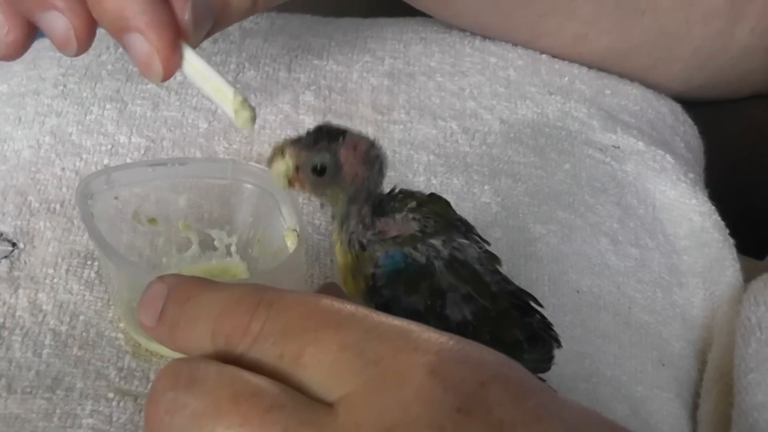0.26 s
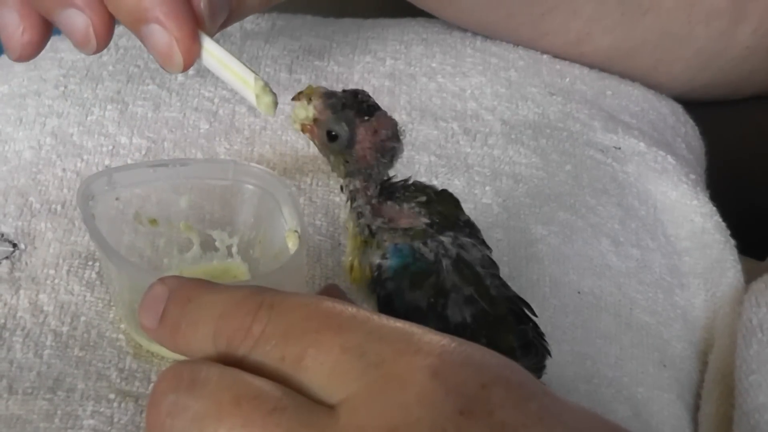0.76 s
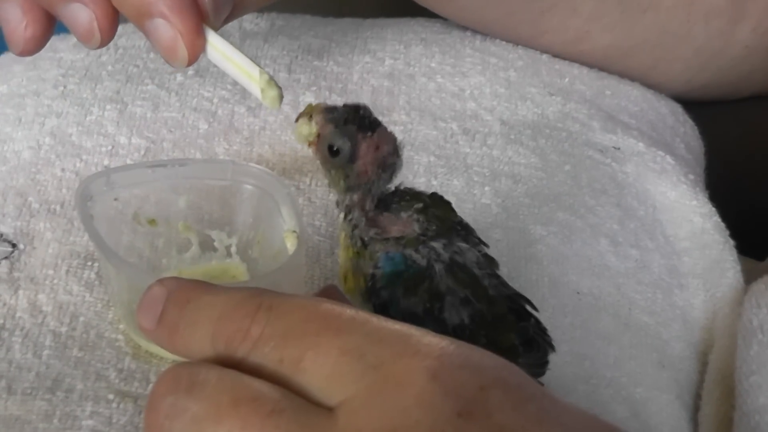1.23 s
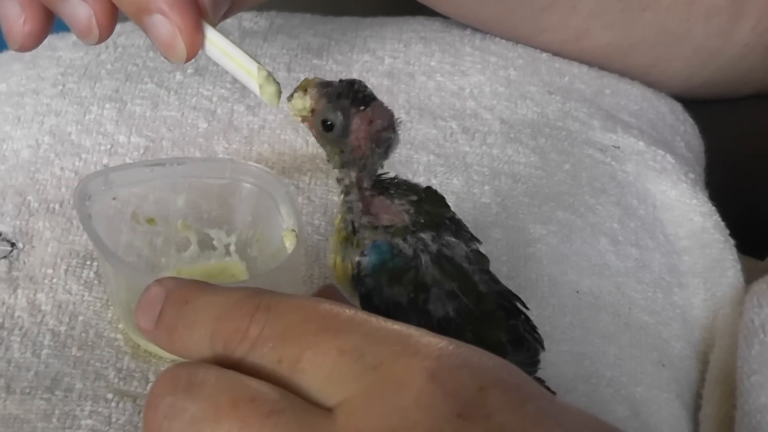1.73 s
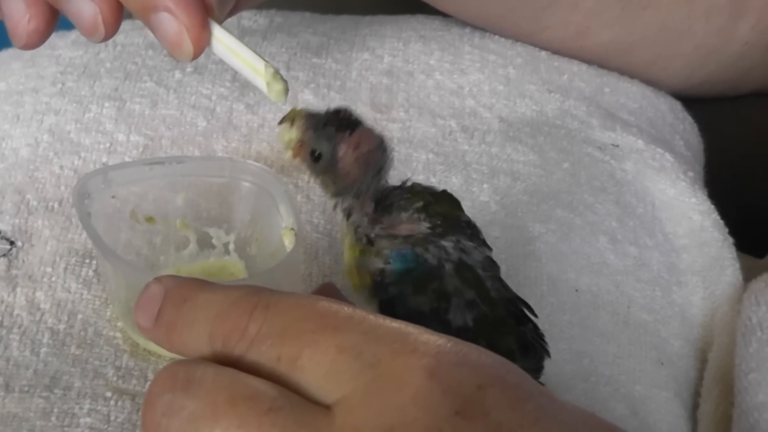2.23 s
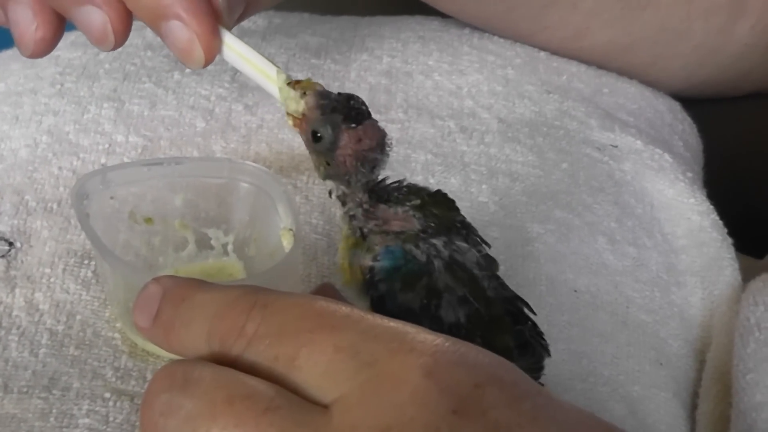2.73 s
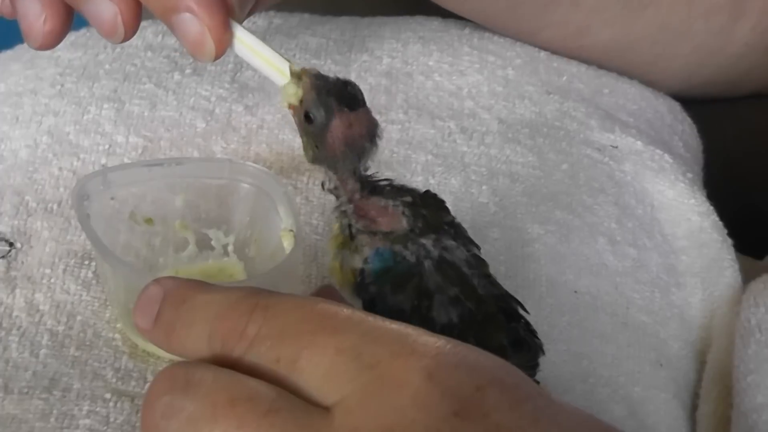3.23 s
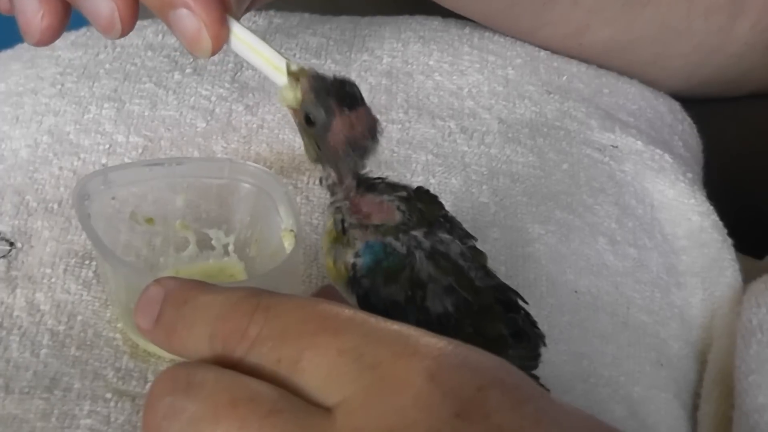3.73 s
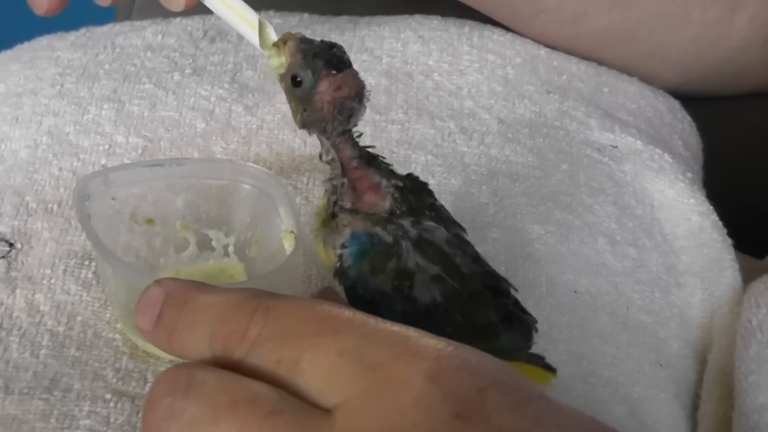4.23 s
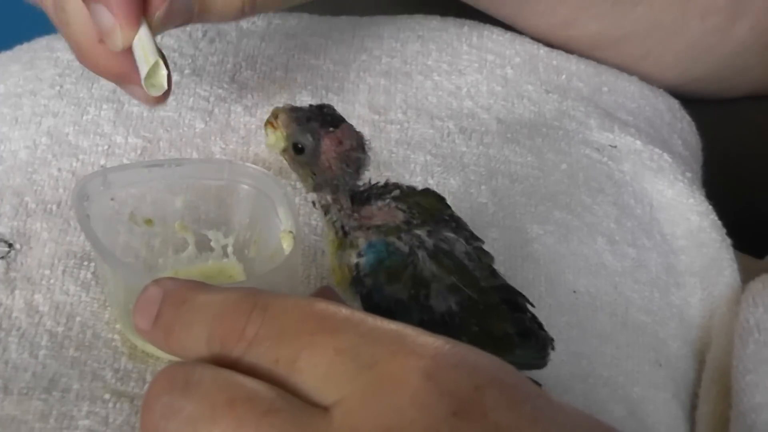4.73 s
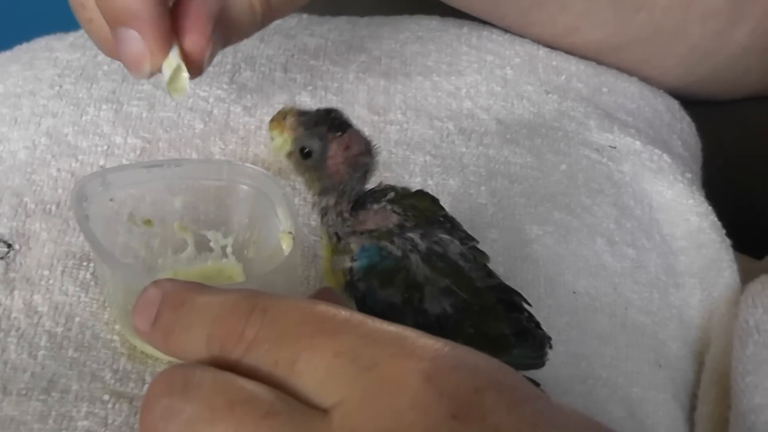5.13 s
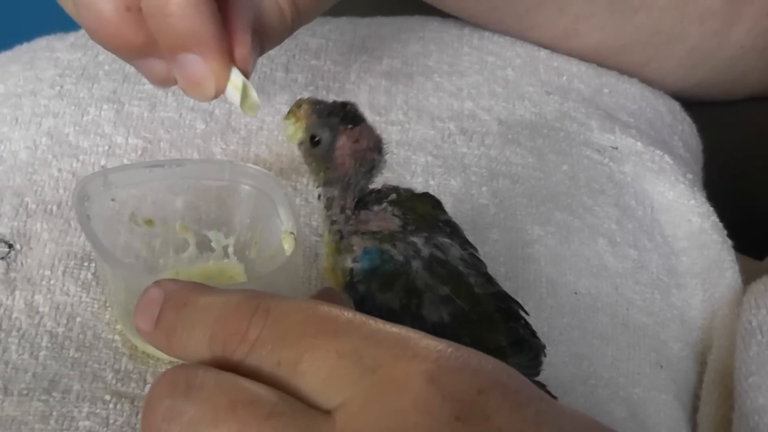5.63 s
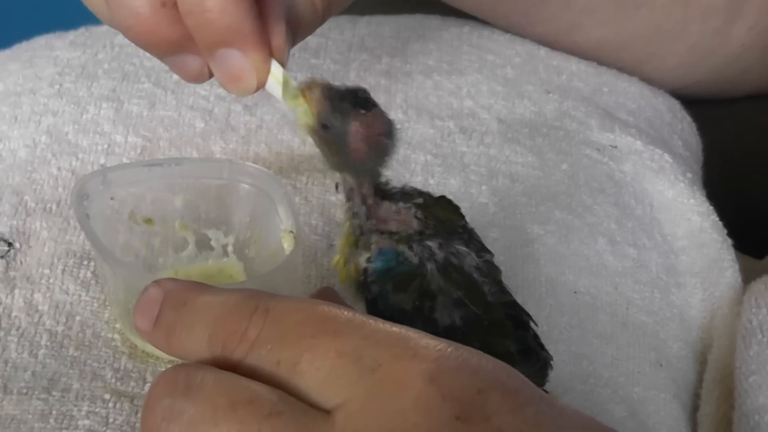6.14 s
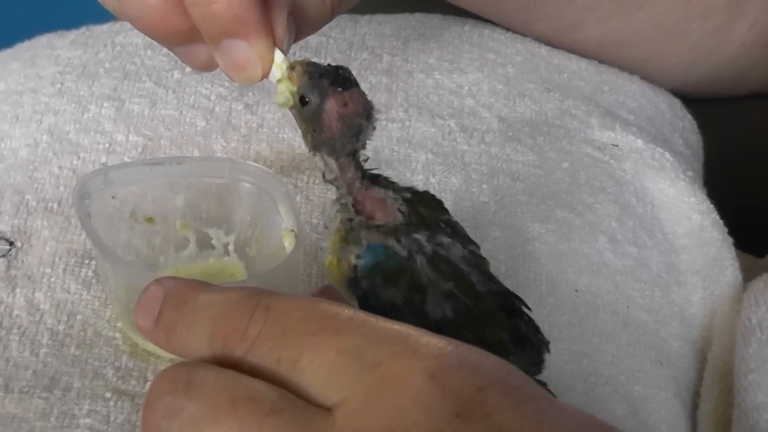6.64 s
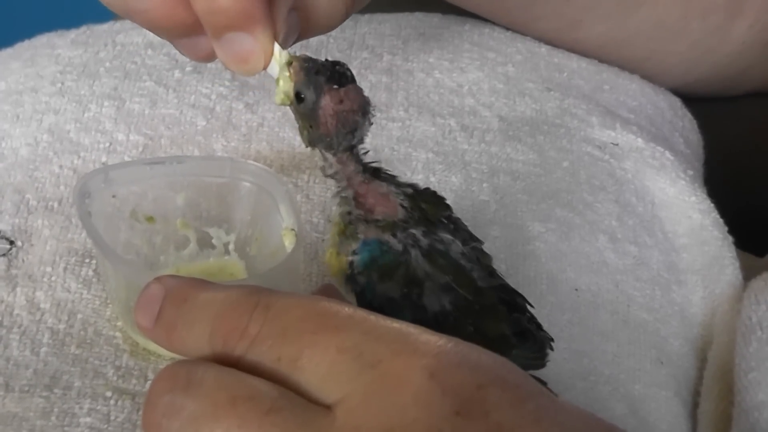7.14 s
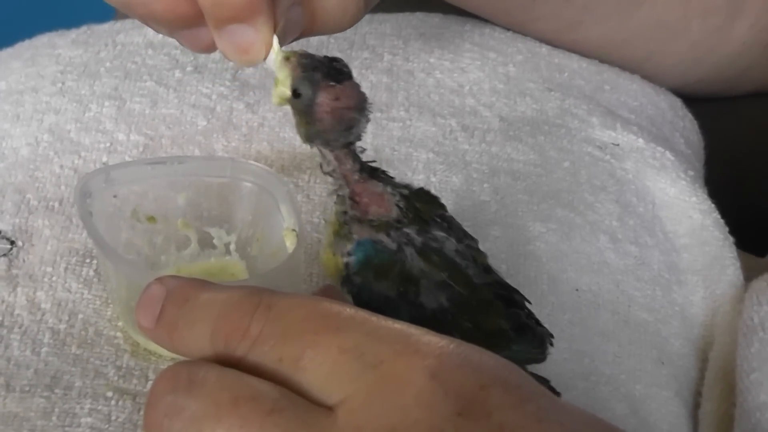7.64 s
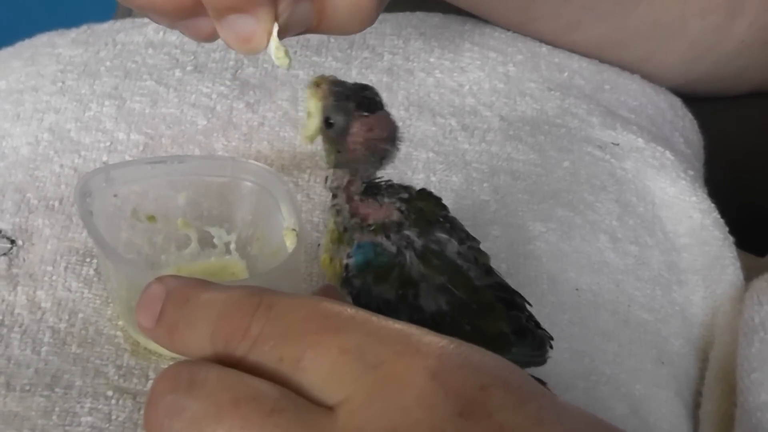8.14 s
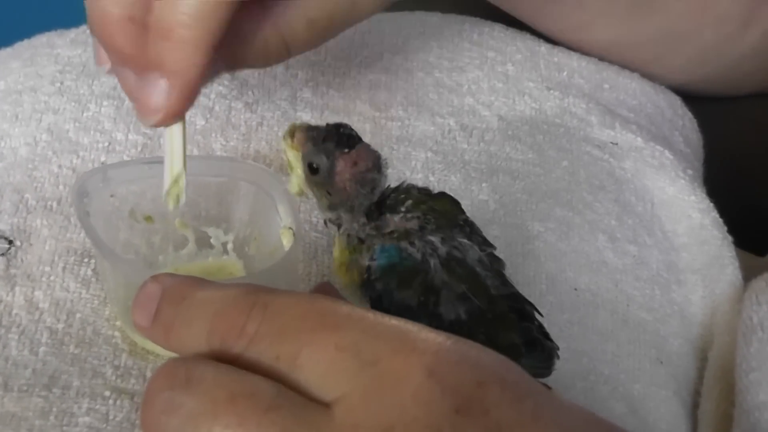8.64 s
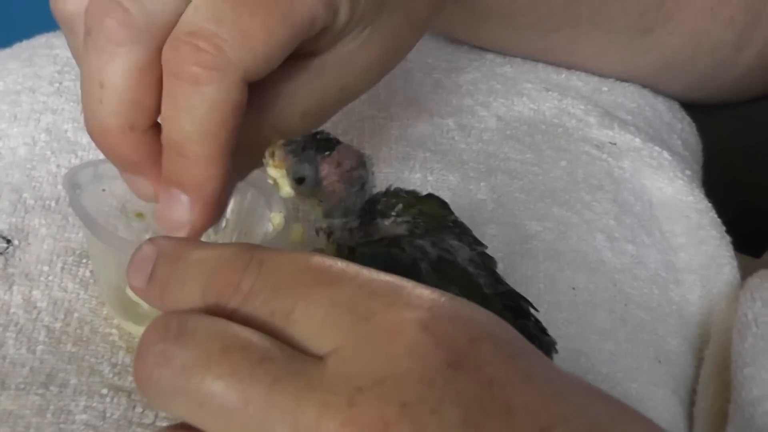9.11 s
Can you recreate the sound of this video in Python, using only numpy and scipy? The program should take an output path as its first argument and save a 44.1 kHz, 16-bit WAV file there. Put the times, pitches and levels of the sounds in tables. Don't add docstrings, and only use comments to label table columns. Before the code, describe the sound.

Indoors, a young bird being hand-fed gives two early chirps, a run of six, one lone call, a run of four, then a final single one. Each is a brief raspy scrape snapping into a piercing whistle that dips and rebounds. Soft airy breaths, dry ticks and faint rubbing fill the pauses, with a muffled road rumble behind. Close miking, short room ring, slight lean to the right; a small cup tap ends it.

```python
import sys
import numpy as np
from scipy import signal
from scipy.fft import rfft, irfft, next_fast_len
from scipy.io import wavfile
from scipy.ndimage import uniform_filter1d

SR = 44100
rng = np.random.default_rng(int(sys.argv[2]) if len(sys.argv) > 2 else 0)


def put_to_file(sound):
    columns = np.atleast_2d(sound).T
    safe = np.clip(columns, -1, 1)
    whole_steps = np.round(safe * 32767)
    wavfile.write(sys.argv[1], SR, whole_steps.astype(np.int16))


def gain_from_decibels(decibels):
    exponent = np.asarray(decibels, float) / 20
    return 10 ** exponent


N = 413216
TIME = np.arange(N) / SR


def rms_one(x):
    return x / np.sqrt(np.mean(x ** 2) + 1e-20)


def in_time(rows, t=TIME):
    s, *columns = np.transpose(rows)
    return [np.interp(t, s, column) for column in columns]


def at_hz(points, hz):
    point_hz, value = np.transpose(points)
    return np.interp(np.log(hz), np.log(point_hz), value)


def drift(rate):
    r = np.exp(-16 * np.pi * rate / SR)
    white = rng.standard_normal(N // 8 + 8002)
    slow = signal.lfilter([1], [1, -2 * r, r * r], white)[8000:]
    return np.interp(np.arange(N) / 8, np.arange(len(slow)), rms_one(slow))


def resonate(x, peaks):
    out = 0
    for k, (hz, width, level_db) in enumerate(peaks):
        r = np.exp(-np.pi * width / SR)
        b = (1 - r * r) / 2 * np.array([1, 0, -1])
        a = [1, -2 * r * np.cos(2 * np.pi * hz / SR), r * r]
        out = out + (-1) ** k * gain_from_decibels(level_db) * signal.lfilter(b, a, x)
    return out


def swell(s, length, power):
    span = slice(max(round(s * SR), 0), round((s + length) * SR))
    return span, np.abs(np.sin(np.pi * (TIME[span] - s) / length)) ** power


# pitch in Hz, likeness from 0 to 1.
LIKENESS = [(40, .9), (125, 0.32), (250, 0.23), (500, 0.56), (1500, 0.34), (3000, 1), (8000, .6)]
# pitch in Hz, left minus right in dB.
LEAN = [(40, -4.5), (200, -1.5), (700, -1.5), (1500, .2), (8000, 0.5)]


def banded_noise(spectrum, edges, patchy_db):
    out, white = 0, rng.standard_normal((2, 2, N))
    for k, (low, high) in enumerate(zip(edges, edges[1:])):
        band = signal.butter(2, [low, high], "band", fs=SR, output="sos")
        mid, side = signal.sosfilt(band, white[k % 2])
        hz = np.sqrt(low * high)
        alike = at_hz(LIKENESS, hz)
        lean_db = at_hz(LEAN, hz) * np.array([[.5], [-.5]])
        gain = gain_from_decibels(at_hz(spectrum, hz) + patchy_db * drift(2.5) + lean_db)
        out = out + gain * (np.sqrt(1 + alike) * mid + np.sqrt(1 - alike) * side * [[1], [-1]])
    return rms_one(out)


# time in seconds, road noise in dB.
TRAFFIC = [(0.0, -53.5), (4.28, -59.5), (5.66, -58.5), (6.24, -59), (7.15, -52.5), (8.14, -57), (8.56, -58),
           (9.37, -57)]
# pitch in Hz, level in dB per Hz.
RUMBLE = [(21, -36), (35, -4.5), (70, -6.5), (221, -1), (280, -5), (400, -4.5), (520, -38), (880, -120)]
# pitch in Hz, level in dB per Hz.
ROAD = [(280, -1), (436, -3.5), (512, 1.5), (609, -5.5), (684, 1), (743, 1.5), (1300, -8)]
# pitch in Hz, level in dB per Hz.
HISS = [(1190, 0), (1400, 1.5), (1640, 1.5), (2910, -14.5), (3720, -10), (5120, -16), (15500, -32)]


def traffic():
    hiss_lead_s = 0.8
    road_db, = in_time(TRAFFIC)
    coming_db, = in_time(TRAFFIC, TIME + hiss_lead_s)
    rumble_db = -55.5 + 0.3 * (road_db - road_db.mean())
    hiss_db = -58 + 0.48 * (coming_db - road_db.mean())
    out = gain_from_decibels(rumble_db) * banded_noise(RUMBLE, np.geomspace(36, 330, 8), patchy_db=3.0)
    out += gain_from_decibels(road_db + 2.6) * banded_noise(ROAD, np.geomspace(300, 1200, 7), patchy_db=2.4)
    out += gain_from_decibels(hiss_db) * banded_noise(HISS, np.geomspace(1200, 16000, 9), patchy_db=1.2)
    return out


# pitch in Hz, level in dB.
HUM = [(185, -68), (236, -65.5), (140, -74)]
# loudest moment in seconds, fade in dB per second squared,
# pitch in Hz, level in dB.
ENGINES = [(2.7, 15.5, 56.2, -54.5), (4.5, 11, 55.5, -62), (8.6, 2.5, 44.2, -62), (8.12, 32, 87.5, -56),
           (5.5, 7.5, 139, -60.5), (.6, 0.5, 94, -63.5), (5.0, 5.5, 94, -64), (9.14, 31, 110, -61)]


def motors():
    notes = [(hz + 2.5 * drift(1.5), level_db + 3 * drift(1.5)) for hz, level_db in HUM]
    for s, fade_db, hz, level_db in ENGINES:
        notes.append((hz + 0 * TIME, level_db - fade_db * (TIME - s) ** 2))
    tones = 0
    for hz, level_db in notes:
        tones = tones + np.sqrt(2) * gain_from_decibels(level_db) * np.sin(2 * np.pi * np.cumsum(hz) / SR)
    return tones * gain_from_decibels(np.array([[-1.5], [1.5]]))


# start in seconds, length in seconds, level in dB,
# open-beak share from 0 to 1.
PANTS = [(-.1, 0.22, -58.5, 0.47), (0.317, 0.33, -62.5, 0.4), (3.389, 0.38, -68, 0.38),
         (3.829, 0.21, -65.5, 0.46), (4.685, 0.28, -56.5, 0.54), (5.051, 0.094, -72.5, 0.08),
         (6.883, 0.31, -59.5, .5), (7.32, 0.091, -75, 0.2), (7.62, 0.11, -74.5, 0.7),
         (7.92, 0.14, -70.5, 0), (8.338, 0.19, -68, 0), (8.964, 0.31, -57, 0.5)]
# pitch in Hz, width in Hz, level in dB.
WINDPIPE = [(3330, 660, -7), (3950, 520, 2), (4830, 450, 1)]
# pitch in Hz, width in Hz, level in dB.
OPEN_BEAK = [(5250, 340, 0)]


def panting():
    pipe = rms_one(resonate(resonate(rng.standard_normal(N), WINDPIPE), WINDPIPE))
    beak = rms_one(resonate(resonate(rng.standard_normal(N), OPEN_BEAK), OPEN_BEAK))
    uneven, out = gain_from_decibels(2.8 * drift(25.0)), np.zeros(N)
    for s, length, level_db, share in PANTS:
        span, shape = swell(s, length, power=0.7)
        breath = np.sqrt(1 - share) * pipe[span] + np.sqrt(share) * beak[span]
        out[span] += gain_from_decibels(level_db) * shape * uneven[span] * breath
    return out


# time in seconds, peak in dB, centre in Hz, width in Hz.
TICKS = [(0.2074, -55.5, 11700, 6000), (.738, -37.5, 7500, 3000), (1.27, -56.5, 7000, 1980),
         (1.297, -50.5, 7700, 3030), (1.441, -58, 12500, 4040), (1.539, -51.5, 13200, 4980),
         (3.245, -60, 8900, 5070), (4.01, -54.5, 6730, 3020), (4.654, -41.5, 6900, 8000),
         (4.657, -38, 6000, 6070), (7.068, -62, 7500, 3500), (7.593, -44.5, 7900, 4500),
         (8.309, -49, 9100, 5990), (8.4073, -37, 8440, 7270), (8.637, -51.5, 8530, 2500),
         (9.173, -56, 8000, 4960)]


def ticks():
    out, t = np.zeros(N), TIME[:3000]
    for s, level_db, hz, width in TICKS:
        body = [(hz, width, 0)]
        burst = rng.standard_normal(len(t)) * np.exp(-t / .0009)
        burst = resonate(resonate(burst, body), body)
        out[round(s * SR):][:len(t)] += gain_from_decibels(level_db) * burst / np.abs(burst).max()
    return out


# end in seconds, build-up in seconds, level in dB,
# first pitch in Hz, rising squeak in dB.
RASPS = [(0.447, 0.032, -36, 3950, -4), (0.759, 0.015, -36.5, 4310, -12), (1.679, 0.032, -31.5, 2420, -9),
         (1.975, 0.041, -32.5, 3800, -14), (2.294, 0.034, -32.5, 3760, -25),
         (2.636, 0.026, -33, 3745, -23.5), (2.926, 0.034, -35.5, 3286, -9.5), (3.278, 0.025, -39, 4210, -2),
         (4.238, 0.022, -44, 3574, 3.3), (5.647, 0.033, -33, 4050, -10), (5.969, 0.026, -28.5, 4210, -9.5),
         (6.277, 0.023, -34.5, 4200, -11), (6.6, 0.022, -36.5, 4100, -6.5), (8.436, 0.026, -31.5, 3875, -8)]
# pitch in Hz, width in Hz, level in dB.
THROAT = [(4100, 2700, -1), (6780, 520, 11), (7850, 550, 7.5), (9800, 7100, -6.5), (14800, 2484, -30)]
# pitch in Hz, width in Hz, level in dB.
CHEST = [(1600, 390, 1), (2714, 550, -0.5)]


def rasps(rise_db, grain_db):
    noise = rng.standard_normal(N) * gain_from_decibels(grain_db * drift(900.0))
    throat, chest = rms_one(resonate(noise, THROAT)), rms_one(resonate(noise, CHEST))
    waver, out = drift(150.0), np.zeros(N)
    pitch_waver = waver[::-1]
    for (end, length, level_db, first_hz, squeak_db), rows in zip(RASPS, chirp_paths()):
        chest_db = -11.5 + 0.11 * (level_db + 37.5)
        span = slice(round((end - length) * SR), round((end + .012) * SR))
        t = TIME[span] - end
        shape_db = np.where(t < 0, rise_db * t / length, -2500 * t) + 2.5 * waver[span]
        whistle_hz = rows[0][1]
        hz = whistle_hz + (first_hz - whistle_hz) * (t / length) ** 2
        phase = 2 * np.pi * np.cumsum(hz * (1 + 0.02 * pitch_waver[span])) / SR
        squeak = gain_from_decibels(level_db + squeak_db - 7 + 4 * waver[span]) * (np.sin(phase) + .7 * np.sin(2 * phase))
        squeak *= t < 0
        air = throat[span] + gain_from_decibels(chest_db + .5 * shape_db) * chest[span]
        opening = np.minimum(1, (t + length) / 0.0054)
        out[span] += opening * (squeak + gain_from_decibels(level_db + shape_db) * air)
    return out


# crest in seconds, crest to rebound in seconds, crest pitch in Hz,
# crest in dB, rebound in dB.
CHIRPS = [(.484, .056, 6090, -21, -28.5), (.797, .088, 6073, -24, -24.5), (1.712, .085, 6085, -12.5, -19),
          (2.011, 0.099, 6073, -18, -21.5), (2.327, 0.097, 6138, -20, -20.5),
          (2.669, .09, 6106, -17, -21.5), (2.964, 0.09, 6356, -15.5, -26),
          (3.312, 0.082, 6330, -24.5, -25.5), (4.275, .082, 6270, -15, -19.5),
          (5.678, .081, 6310, -16.5, -17.5), (6.004, .08, 6105, -13, -27), (6.314, .087, 6253, -14.5, -20),
          (6.642, .086, 6174, -28.5, -42), (8.468, .076, 6273, -15, -35.5)]
# first pitch in Hz, climb in dB, trough in dB, octave partial in dB,
# octave's loss by the rebound in dB.
VOICING = [(4950, -27, -29, -38, -15), (4950, -30.5, -25.5, -39, -8.5), (4750, -25.5, -24, -39, -10),
           (4850, -26, -22.5, -35, -7), (5020, -27.5, -25, -41, -6.5), (4650, -27.5, -24.5, -40.5, -1.5),
           (4500, -30.5, -26, -53.5, -2), (4720, -26.5, -27, -54, -7), (4200, -42.5, -24, -57, -4.5),
           (4885, -15, -21, -39, -13), (4934, -23, -25.5, -38.5, -14), (4440, -20.5, -23, -49.5, -3),
           (4530, -25.5, -33, -50.5, -7), (4407, -24.5, -26, -47, -28)]
# time in climbs, plus seconds, plus rebound times,
# height from 0 (trough) to 1 (top), share of the octave's loss.
TUNE = [
    (-1.26, 0.003, 0.046, 0.99, 0.14),
    (-0.6, 0, 0.056, .58, 0.02),
    (-.33, 0.0015, 0.03, .78, 0.033),
    (0, .004, 0.0048, 1.0, 0.66),
    (0, .02, 0, .16, 0.17),
    (0, .011, 0.364, -.02, 0.24),
    (-0.19, .004, .68, .1, .7),
    (0, 0.00091, 0.97, 1.0, 1.0),
    (0, .017, 0.94, 0.93, 0.97),
]


def chirp_paths():
    climbs, seconds, rebounds, height, loss = np.transpose(TUNE)
    trough_hz, rebound_hz = 5246, 5945
    for (crest, back, crest_hz, crest_db, rebound_db), voice, rasp in zip(CHIRPS, VOICING, RASPS):
        first_hz, climb_db, trough_db, octave_db, loss_db = voice
        rasp_end, rasp_db = rasp[0], rasp[2]
        break_db = trough_db - 2 - 0.55 * (crest_db - trough_db)
        level_db = np.array([rasp_db - 1.5, climb_db, crest_db - 3, crest_db, break_db,
                             trough_db, trough_db - 1, rebound_db, rebound_db - 20.5])
        s = crest + climbs * (crest - rasp_end) + seconds + rebounds * back
        top_hz = np.select([climbs < -1, rebounds > .5], [first_hz, rebound_hz], crest_hz)
        octave_db = octave_db + loss * loss_db
        octave_db[[3, -1]] += -2, -15
        low_hz = trough_hz + 13.5 * max(trough_db - rebound_db, 0)
        yield np.transpose([s, low_hz + height * (top_hz - low_hz), level_db, octave_db - level_db])


# start in seconds, length in seconds,
# half-pitch depth in dB.
SLIPS = [(0.463, 0.02, -42), (0.8, 0.0047, -18), (1.693, 0.012, -29.5), (1.746, .045, -34),
         (1.975, 0.027, -16.5), (2.081, 0.02, -30), (2.307, 0.0074, -14), (2.337, 0.005, -13),
         (2.398, 0.022, -34.5), (2.74, 0.021, -32.5), (2.916, 0.053, -31.5), (3.037, 0.013, -32.5),
         (3.302, 0.035, -30.5), (4.274, .01, -42), (5.756, 0.02, -43), (6.389, 0.017, -41),
         (6.638, 0.013, -27.5)]


def whistles(direct_db, jitter, breath_db, third_db):
    out, slip = np.zeros(N), np.zeros(N)
    for s, length, depth_db in SLIPS:
        slip += gain_from_decibels(depth_db) * np.exp(-((TIME - s - length / 2) / (length / 2)) ** 4)
    flutter, shimmer, strain = drift(300.0), drift(70.0), drift(90.0)
    slip_flutter = flutter[::-1]
    air = resonate(resonate(rng.standard_normal(N), THROAT[:4]), [(7800, 6000, 0)])
    air = rms_one(air) * gain_from_decibels(4.5 * drift(160.0))
    for rows in chirp_paths():
        start, end = rows[0][0], rows[-1][0]
        span = slice(round(start * SR), round(end * SR))
        t = TIME[span]
        hz, level_db, octave_db = in_time(rows, t)
        pressure = np.interp(t, rows[:, 0], gain_from_decibels(rows[:, 2] / 2))
        level_db = 20 * np.log10(pressure ** 2)
        hz = uniform_filter1d(hz, size=300, mode="nearest") * (1 + jitter * flutter[span])
        level_db, octave_db = uniform_filter1d([level_db, octave_db], size=100, mode="nearest")
        octave_db += 2.5 * strain[span]
        phase = 2 * np.pi * np.cumsum(hz) / SR
        gape_db = 1.5 * np.tanh((hz - 5850) / 80) - 1.5 + 1.8 * shimmer[span]
        overtones = np.sin(2 * phase) + gain_from_decibels(third_db) * np.sin(3 * phase)
        tone = gain_from_decibels(gape_db) * np.sin(phase) + gain_from_decibels(octave_db) * overtones
        broken = phase + .5 * slip_flutter[span]
        halves = np.sin(1.5 * broken) + .2 * np.sin(.5 * broken)
        tone += slip[span] * (halves * gain_from_decibels(2 * strain[span]) + .6 * air[span])
        tone += gain_from_decibels(0.8 * octave_db + breath_db) * air[span]
        ramp = np.minimum(1, np.minimum(t - start, end - t) / .002)
        out[span] += np.sqrt(2) * gain_from_decibels(level_db + direct_db) * ramp * tone
    return out


# start in seconds, length in seconds, level in dB,
# centre in Hz, width in Hz.
RUBS = [(0.644, .1, -68, 7300, 3000), (4.58, 0.07, -69, 8280, 4950), (4.788, 0.12, -66.5, 7000, 2980),
        (5.232, 0.17, -68, 6560, 3170), (6.948, 0.19, -68.5, 6400, 2480), (8.812, 0.13, -64.5, 6660, 4950),
        (8.878, 0.03, -60.5, 7000, 7000), (8.979, 0.123, -57.5, 6540, 3030),
        (9.084, 0.11, -58.5, 5530, 2500), (9.088, 0.049, -61, 2320, 1800), (9.106, 0.186, -71, 8000, 5930)]


def rubs():
    grains, out = rng.standard_normal(N) * gain_from_decibels(2.4 * drift(126.0)), np.zeros(N)
    for s, length, level_db, hz, width in RUBS:
        span, shape = swell(s, length, power=0.77)
        body = [(hz, width, 0)]
        rub = resonate(resonate(resonate(grains[span], body), body), body)
        out[span] += gain_from_decibels(level_db) * shape * rms_one(rub)
    return out


# time in seconds, peak in dB.
KNOCKS = [
    (9.0945, -39),
    (9.112, -46),
]
# pitch in Hz, level in dB, time to fade by 60 dB in seconds.
CUP = [(1940, 4.5, 0.015), (2920, 4, 0.01), (5500, 6, 0.018)]


def knocks():
    out, t = np.zeros(N), TIME[:3000]
    for s, level_db in KNOCKS:
        rings = sum(gain_from_decibels(mode_db - 60 * t / t60) * np.sin(2 * np.pi * hz * t) for hz, mode_db, t60 in CUP)
        out[round(s * SR):][:len(t)] += gain_from_decibels(level_db - 5.0) * rings * np.minimum(t / .0015, 1)
    return out


# low edge in Hz, high edge in Hz, level in dB,
# time to fade by 60 dB in seconds.
ROOM = [(300, 1200, 2.5, 0.29), (3500, 9020, 1, 0.42), (8000, 21000, -8, .22)]
# pitch in Hz, left minus right in dB.
BEAK_LEAN = [(3000, 0.4), (6000, -1.5), (10500, -1), (13000, -2.5)]
# pitch in Hz, left's lead in radians.
BEAK_LEAD = [(6000, 0.01), (9600, -.05), (10400, -0.35), (12100, -0.4), (14000, -.4)]


def room(x):
    echo_db, gap_s, alike = -13, 0.004, 0.96
    t, size = TIME[:SR], next_fast_len(N + SR)
    white, echoes = rng.standard_normal((2, SR)), 0
    for low_hz, high_hz, level_db, t60 in ROOM:
        band = signal.sosfilt(signal.butter(2, [low_hz, high_hz], "band", fs=SR, output="sos"), white)
        echoes = echoes + band * gain_from_decibels(level_db - 60 * t / t60)
    echoes = echoes * np.clip(t / gap_s - .5, 0, 1)
    pair = np.sqrt(1 + alike) * echoes[0] + np.sqrt(1 - alike) * echoes[1] * np.array([[1], [-1]])
    pair = gain_from_decibels(echo_db) * pair / np.sqrt(np.sum(pair ** 2) / 2)
    hz, half = np.arange(size // 2 + 1) * SR / size + 1, np.array([[.5], [-.5]])
    straight = gain_from_decibels(half * at_hz(BEAK_LEAN, hz)) * np.exp(1j * half * at_hz(BEAK_LEAD, hz))
    return irfft((straight + rfft(pair, size)) * rfft(x, size), size)[:, :N]


def scene():
    voice = rasps(rise_db=13, grain_db=3)
    voice = voice + whistles(direct_db=2.65, jitter=0.0028, breath_db=-24.5, third_db=-32.5)
    close = panting() + ticks() + voice + rubs() + knocks()
    return traffic() + motors() + room(close)


def roll_off(x):
    return signal.sosfilt(signal.butter(12, 15810, fs=SR, output="sos"), x)


def record(dry):
    x = signal.sosfilt(signal.butter(4, 38, "high", fs=SR, output="sos"), dry)
    over_db = np.maximum(20 * np.log10(np.abs(x).max(axis=0) + 1e-9) + 14, 0)
    recovery_db = 25 * TIME
    held_db = np.maximum.accumulate(0.25 * over_db + recovery_db) - recovery_db
    x = x * gain_from_decibels(-uniform_filter1d(held_db, size=200))
    x = signal.sosfilt(signal.ellip(10, .5, 60, 15800, fs=SR, output="sos"), x)
    return roll_off(x)


dry = scene()
out = record(dry)
put_to_file(out)
```